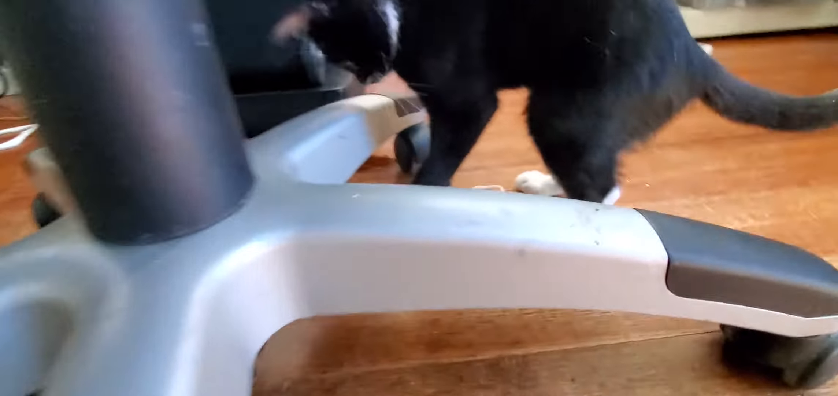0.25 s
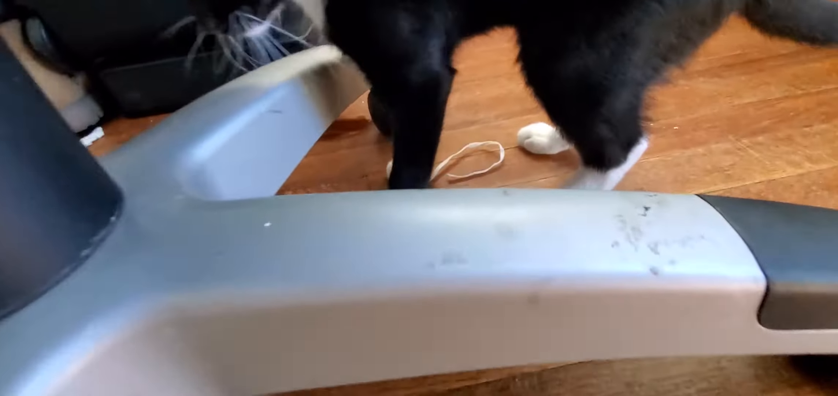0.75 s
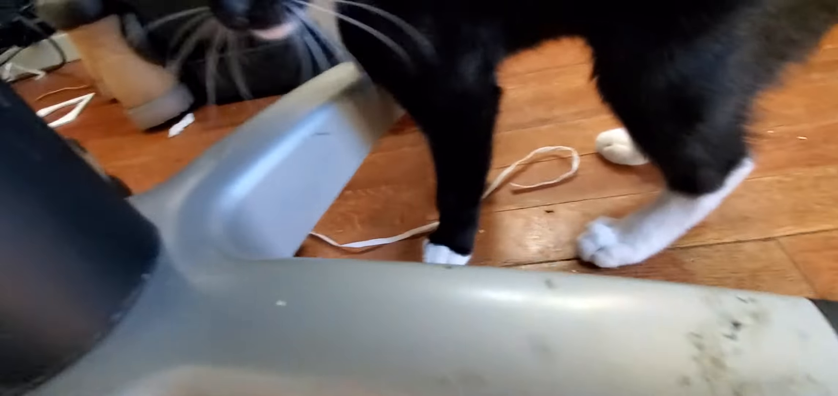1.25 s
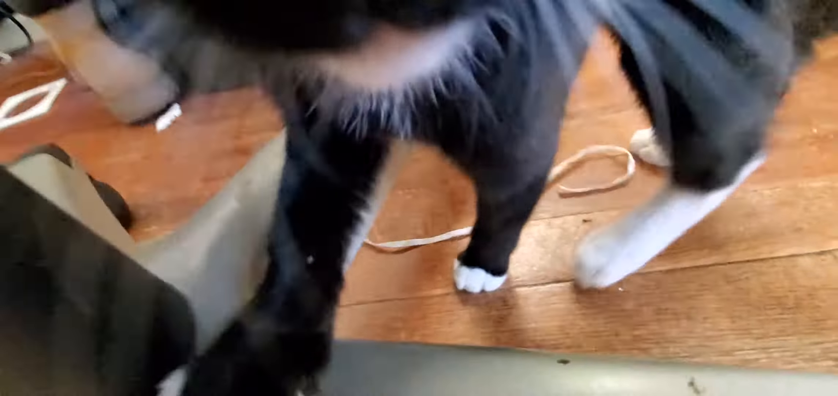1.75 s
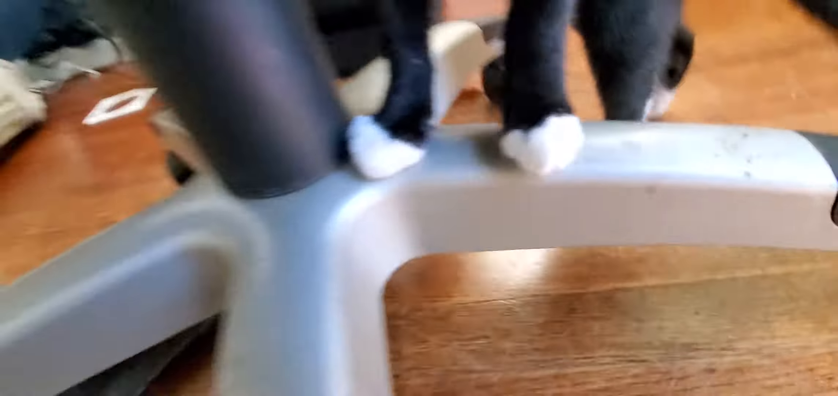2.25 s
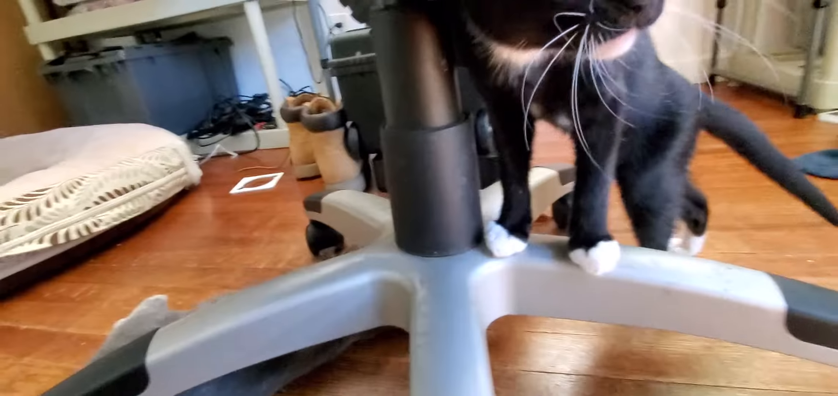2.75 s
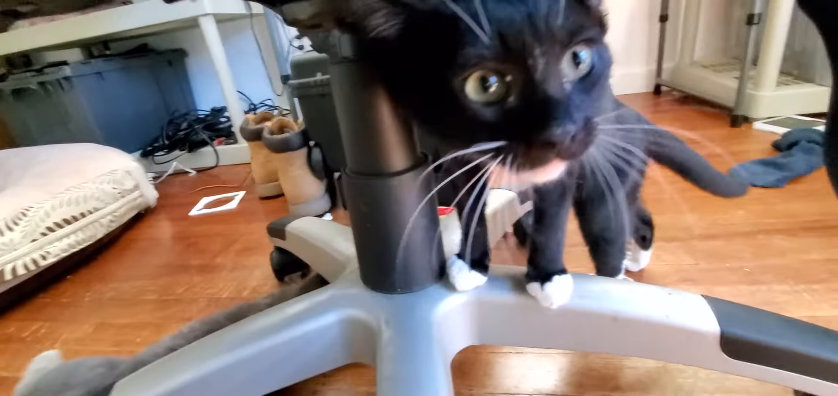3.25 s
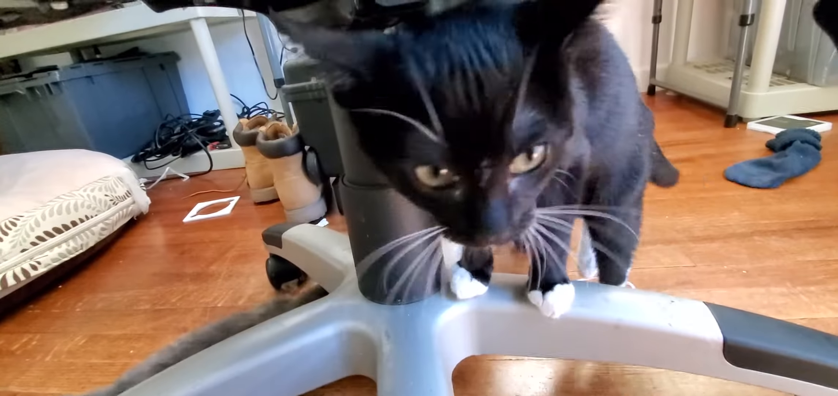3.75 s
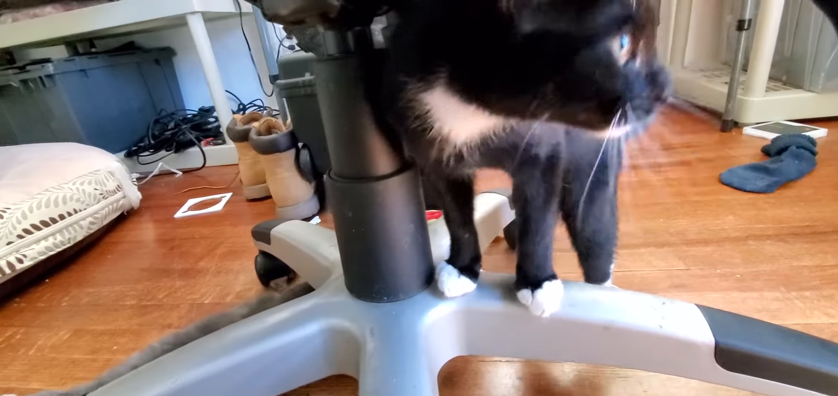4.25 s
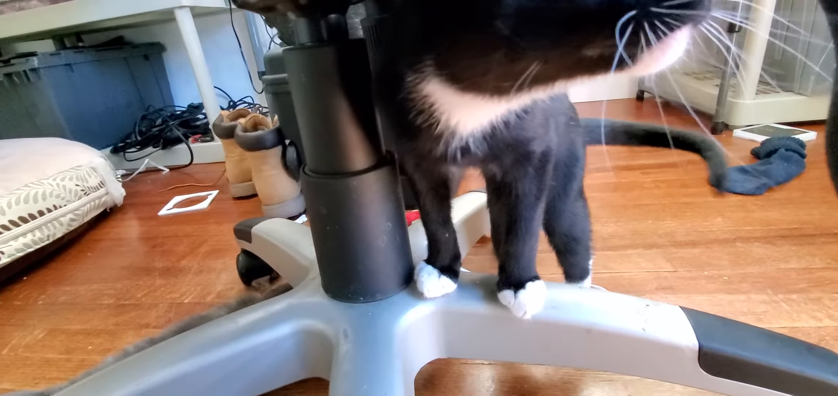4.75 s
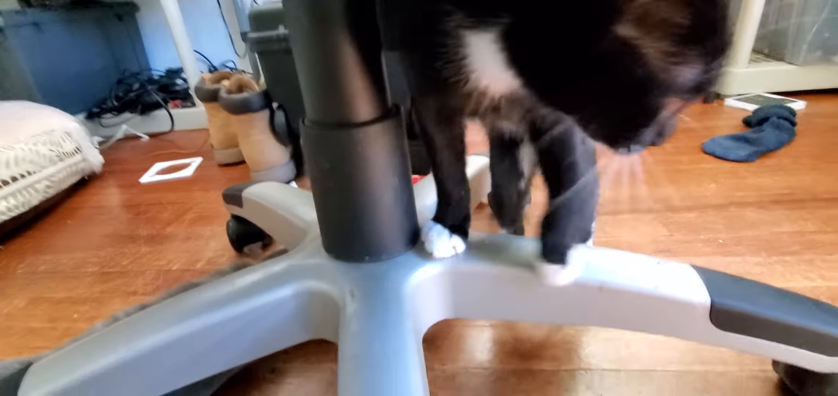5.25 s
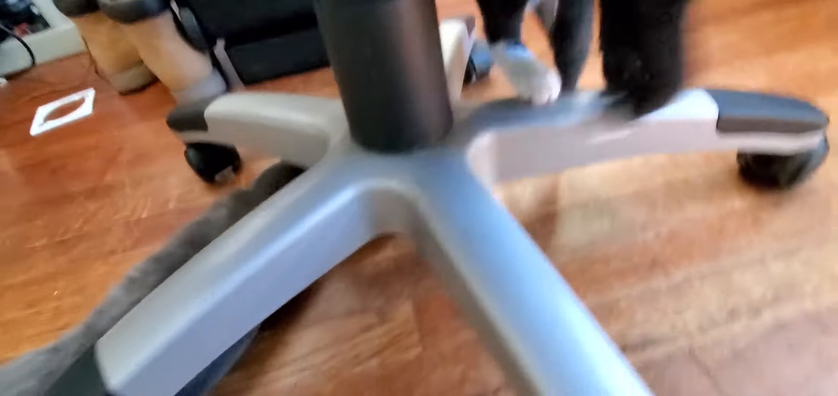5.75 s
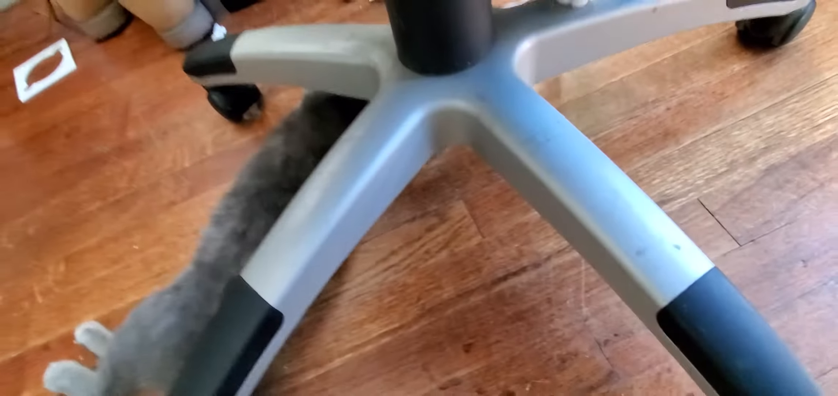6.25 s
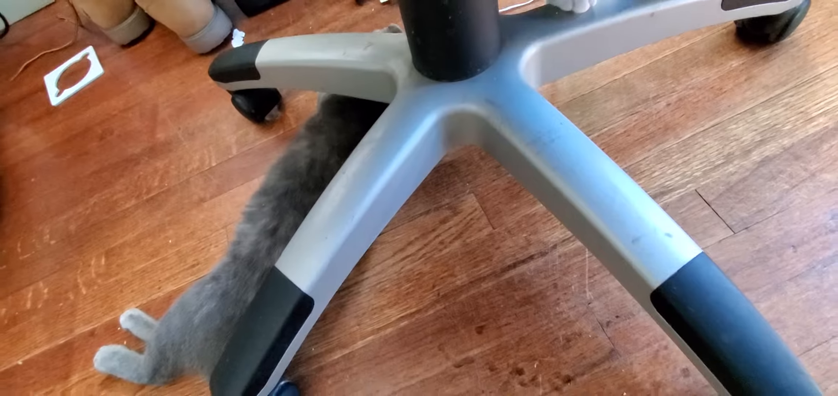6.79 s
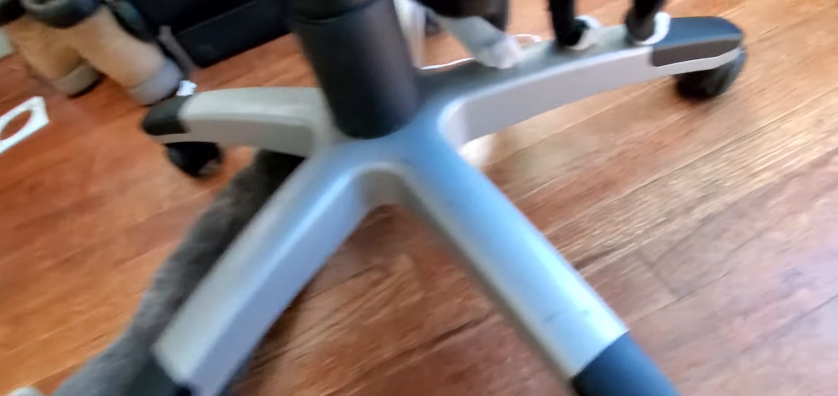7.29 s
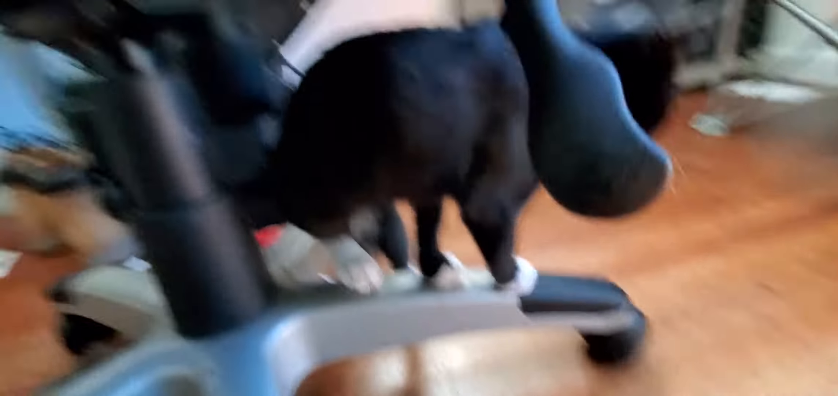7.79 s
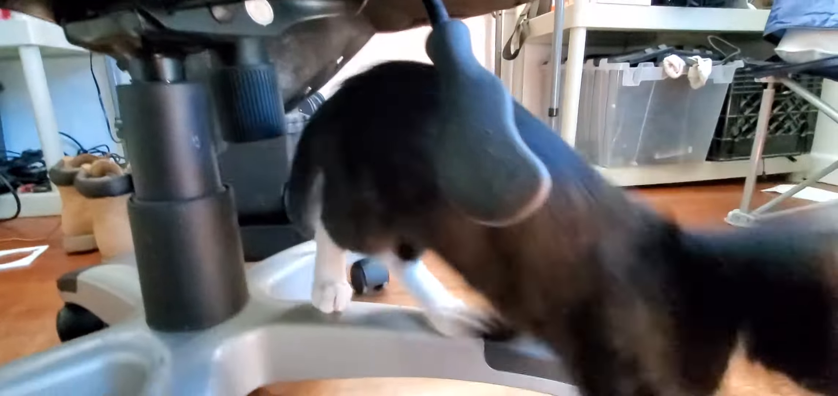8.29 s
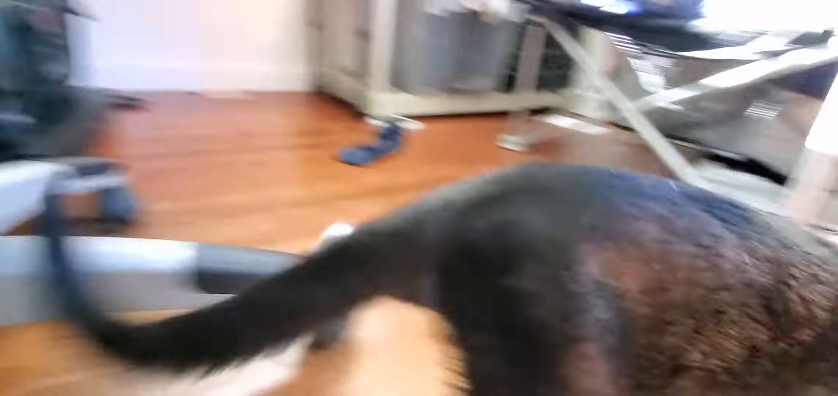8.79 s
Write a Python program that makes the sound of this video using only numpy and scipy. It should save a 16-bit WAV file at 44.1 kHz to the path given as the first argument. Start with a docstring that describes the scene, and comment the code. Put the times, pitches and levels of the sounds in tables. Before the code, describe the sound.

Quiet indoor stereo close-up: faint room noise and mains hum throughout. Small paws pad and scuff, claws tick on hard plastic, and two dry knocks crack out after a second. Just over a second later comes the loudest moment, a dense hollow clatter with thumps, followed by a short four-step rasp. The rest is nearly still, with isolated clicks, a small double knock, taps on the microphone's casing and soft final footfalls.

```python
"""A kitten clambers over the hollow plastic base of an office chair on a hardwood floor, beside a camera.
0-1.6 s: paws thud and scuff, claws click, two loud knocks near 1.1 s. 2.3-2.6 s: a loud burst of knocks.
2.8 s: a four-slip stuttering scrape. Then sparse clicks, knocks and case ticks; at 8.3 s thuds, then a soft rub.
Contacts are noise bursts shaped by resonances, ticks are dispersed pulses, thuds uneven swelling sines,
rubs and scuffs swells of noise. Room noise and a low mains hum run throughout."""
import sys
import numpy as np
from scipy import signal
from scipy.fft import rfft, irfft, next_fast_len
from scipy.io import wavfile
from scipy.ndimage import map_coordinates

SR = 44100
rng = np.random.default_rng(int(sys.argv[2]) if len(sys.argv) > 2 else 0)


def to_wav(s):
    """Save 16-bit WAV."""
    ch = np.atleast_2d(s).T  # columns
    pcm = np.round(np.clip(ch, -1, 1) * 32767)  # PCM
    wavfile.write(sys.argv[1], SR, pcm.astype(np.int16))


N = 398223
SIZE = 32768  # samples in one short event
HZ = np.fft.rfftfreq(SIZE, 1 / SR)
T = np.arange(SIZE) / SR

# blows on the chair base, level before gain_db: [t/s, level/dB, hardness/dB, ring f/Hz, t60/s, L-R/dB]
KNOCKS = [(0.1, -38, -3, 1100, 0.038, -16), (.853, -45, -7, 695, 0.035, -5),
          (1.0613, -24.5, -2.5, 1770, 0.018, -2.5), (1.09, -35, -10, 1240, .015, -1),
          (1.112, -20, 1, 1420, 0.015, -3.5), (1.56, -48.5, -9.5, 850, .022, -6),
          (2.3341, -30, 3, 2300, 0.041, 1.5), (2.339, -24, -7.5, 1500, 0.026, 0),
          (2.392, -15, -2.5, 720, .02, 1), (2.4075, -26, 7, 850, 0.011, -3.5),
          (2.4118, -15, -2.5, 1100, 0.024, -1), (2.4168, -19, -4.5, 680, 0.017, 0),
          (2.4563, -24, 1, 1400, .025, -2), (2.462, -13, 7.5, 740, .036, -1.5),
          (2.544, -40.5, 0, 1300, 0.025, 0), (2.629, -42, -8.5, 740, 0.063, 0),
          (2.906, -51, -9, 900, 0.015, 1), (5.237, -43.5, -32, 656, .05, -2),
          (5.273, -47, -26, 450, 0.032, -4), (7.3017, -34, -15, 735, .008, -6),
          (7.3104, -46, -35, 680, .02, 0)]
# spectrum of a blow: [f/Hz, level/dB]
KNOCK_TONE = [(60, -29), (200, -11), (350, -5.5), (500, -7.5), (720, -4.5), (1000, -5.5), (1400, -6.5),
              (2000, -4.5), (3000, -9.5), (4300, -14.5), (6000, -28.5), (8500, -46.5), (14000, -50.5)]
# where hardness adds treble: [f/Hz, share of hardness/1]
KNOCK_EDGE = [(1100, 0), (2400, 0.34), (4800, 1), (9000, .1)]


def knocks(gain_db=-1, even_hz=1140, weight_db_per_octave=10.5):
    """Blows on the base: the further a spot rings below even_hz, the more bass weight it gets."""
    rows = []
    for s, db, hard_db, ring_hz, t60_s, pan_db in KNOCKS:
        bass_db = weight_db_per_octave * np.log2(even_hz / ring_hz)
        rows.append((s, db + gain_db, bass_db, hard_db, ring_hz, t60_s, pan_db))
    return strikes(rows, KNOCK_TONE, KNOCK_EDGE, snap=.17, ring_db=9, sharpness=6,
                   ripple_db=2.5, spacing_hz=44.77, room_db=-12.5, grit_db=1.5)


def scrape(start_s=2.7932, slip_s=.02, rebound_s=.0048, first_db=-27, loss_db=2.5,
           bass_db=-12, bass_gain_db=4, hard_db=-1, rebound_hard_db=-8, dulling_db=1.5,
           ring_hz=1650, t60_s=.047, drag_s=.0057, pan_db=-1, count=4):
    """Stick-slip rasp: each slip catches twice; successive slips are weaker, duller and longer."""
    rows = []
    for k in range(count):
        for late_s, edge_db in [(0, hard_db), (rebound_s, rebound_hard_db)]:
            rows.append((start_s + k * slip_s + late_s, first_db - k * loss_db,
                         bass_db + k * bass_gain_db, edge_db - k * dulling_db,
                         ring_hz, t60_s + k * drag_s, pan_db))
    return strikes(rows, CLAW_TONE, CLICK_EDGE, snap=.088, ring_db=4.5, sharpness=3.3,
                   ripple_db=2.5, spacing_hz=70.1, room_db=-9.5, grit_db=2.0)


# claws catching on the plastic: [t/s, level/dB, hardness/dB, ring f/Hz]
CLAWS = [(.033, -51, -28, 885), (0.057, -55.5, 10, 5470), (0.11, -42.5, -19, 3120),
         (0.2029, -54.5, -3.5, 2800), (0.3996, -43.5, 1.5, 1540), (0.67, -55.5, 11, 3170),
         (.748, -47.5, 8, 4750), (0.761, -43.5, 8, 4470), (0.8344, -49, 10, 2640), (.931, -54, -16, 2800),
         (.987, -43, -3, 2300), (1.005, -49, -9, 1500), (1.028, -48, -16, 1300), (3.554, -39, -1, 1700),
         (5.438, -52.5, 0, 3000), (5.957, -51, -6, 2018), (6.382, -54, -2, 4000)]
# spectrum of a claw contact, also of the scrape: [f/Hz, level/dB]
CLAW_TONE = [(60, -12.5), (300, -8), (700, -5), (1100, -13), (1500, -4.5), (2400, -3), (4000, -5.5),
             (6000, -7.5), (8500, -24), (14000, -21)]
# where hardness adds treble in claws, scrape and ticks: [f/Hz, share of hardness/1]
CLICK_EDGE = [(2800, 0), (4800, .42), (9000, 0.99)]


def claws(bass_db=-2, t60_s=.03, pan_db=-4.5):
    """Light claw contacts: bass-shy clicks of one decay time, right of centre."""
    rows = [(s, db, bass_db, hard_db, ring_hz, t60_s, pan_db) for s, db, hard_db, ring_hz in CLAWS]
    return strikes(rows, CLAW_TONE, CLICK_EDGE, snap=.2, ring_db=6.5, sharpness=4.8,
                   ripple_db=2.0, spacing_hz=69.16, room_db=-8.5, grit_db=2.0)


def strikes(rows, tone, edge, snap, ring_db, sharpness, ripple_db, spacing_hz, room_db, grit_db):
    """Contacts on the base: a snap and a gritty, decaying rattle excite its resonances and the room."""
    track = np.zeros((2, N))
    body_db = along(tone, HZ) + base_db(HZ) + ripple_db * ripple(spacing_hz)
    for s, db, bass_db, hard_db, ring_hz, t60_s, pan_db in rows:
        grit = amp(grit_db * map_coordinates(rng.standard_normal(1024), [900 * T]))  # 900 knots/s
        rattle = ports(rng.standard_normal((2, SIZE))) * grit * fade(t60_s)
        force = unit(rattle) / np.sqrt(SIZE)
        force[1, 0] += snap  # right first
        force[0, 8] -= snap  # left 8 samples later, inverted
        whole = rfft(force) * causal(amp(body_db + touch(bass_db, hard_db, edge)))
        spot = causal(amp(ring(ring_hz, ring_db, sharpness)))
        near = levelled(irfft(whole * spot), db, pan_db)
        far = levelled(irfft(whole), db + room_db, pan_db / 2)  # whole base feeds the room
        add(track, s, near + room(far))
    return track


# resonances of the hollow base: [f/Hz, width/Hz, lift/dB]
BASE = [(350, 34, 1.5), (778, 110, 3.5), (1190, 140, 5), (1669, 170, 2.5), (2220, 160, -2), (3000, 390, 4),
        (3800, 160, 1.5)]


def base_db(f):
    """Resonant lift of the hollow base at f, in dB."""
    return sum(db / (1 + (2 * (f - hz) / width_hz) ** 2) for hz, width_hz, db in BASE)


def ring(ring_hz, lift_db, sharpness):
    """Resonance of the spot hit: dB over HZ."""
    return lift_db / (1 + (sharpness * (HZ / ring_hz - 1)) ** 2)


def ripple(spacing_hz):
    """Thicket of small modes: a smooth random curve over HZ."""
    return map_coordinates(rng.standard_normal(4096), [HZ / max(spacing_hz, 10)])


def touch(bass_db, hard_db, edge):
    """Contact colour: weight lifts the bass, hardness the treble; dB over HZ."""
    weight_db = along([(250, bass_db / 2), (650, bass_db), (1100, 0)], HZ)
    return weight_db + hard_db * along(edge, HZ)


# soft, heavy footfalls and bumps: [t/s, peak level/dB, f/Hz, swell/s]
THUDS = [(0.066, -39.5, 87.6, 0.0085), (.978, -27.5, 47.2, .018), (1.025, -42, 44, 0.05),
         (1.38, -50, 114, .024), (1.444, -39.5, 169, .01), (2.39, -21.5, 249.8, .003),
         (2.397, -20.5, 62, 0.0075), (2.413, -20.5, 100.7, .005), (2.416, -23, 355, .003),
         (2.469, -36, 63, .02), (2.509, -35, 114, 0.015), (5.273, -46.5, 143, 0.0098),
         (6.022, -44.5, 94.95, 0.01), (8.266, -44, 73.4, .014), (8.275, -44.5, 157, 0.017)]


def thuds(pan_db=-2, uneven_rad=.82, lag_s=.001):
    """Soft weight sets off slow, uneven cycles that swell and die; left lags right."""
    track = np.zeros((2, N))
    lags_s = np.array([[lag_s / 2], [-lag_s / 2]])
    for s, db, hz, swell_s in THUDS:
        u = T / max(swell_s, 1e-3)
        swell = u * np.exp(1 - u)  # peak 1 at swell_s
        slip = np.array([map_coordinates(knots, [hz * T]) for knots in rng.standard_normal((2, 256))])
        phase_rad = 2 * np.pi * hz * (T - lags_s) + uneven_rad * slip
        add(track, s, amp(db) * swell * np.sin(phase_rad) * pan(pan_db))
    return track


# fur and pads sliding: [middle t/s, length/s, level/dB]
SCUFFS = [(0.102, .039, -51), (0.258, .15, -61.5), (0.793, 0.37, -58), (1.018, 0.071, -48.5),
          (1.143, 0.049, -44.5), (1.337, 0.64, -62), (5.554, 0.099, -63.5), (8.797, 0.2, -68)]
# spectrum of the friction: [f/Hz, level/dB]
SCUFF_TONE = [(150, 5.5), (400, 0.5), (1000, 3), (2000, -1), (4500, -3), (6500, -11), (8500, -26),
              (13000, -15.5), (16000, -16.5)]


def scuffs(grain_db=4, catch_db=2.0, pan_db=-3, coupling=.52):
    """Friction swells that catch and slip in fine grains, partly coloured by the base."""
    t = np.arange(N) / SR
    strokes = sum(amp(db) * np.exp(-2 * ((t - s) / length_s) ** 2) for s, length_s, db in SCUFFS)
    grains = rng.standard_normal((2, N)) * amp(grain_db * wobble(700) + catch_db * wobble(60))

    def colour(hz):
        return amp(along(SCUFF_TONE, hz) + coupling * base_db(hz))

    return strokes * unit(filtered(ports(grains), colour)) * pan(pan_db)


# pads and hands rubbing on hollow plastic: [middle t/s, length/s, level/dB, resonance f/Hz]
RUBS = [(0.159, 0.065, -65.5, 174), (0.86, 0.027, -50.5, 278), (1.033, 0.016, -49, 390),
        (1.818, 0.079, -60, 410), (4.629, 0.037, -63.5, 327), (6.099, 0.055, -61.5, 543),
        (8.761, .15, -59, 228)]


def rubs(sharpness=4.5, pan_db=-2):
    """Soft rubbing stirs one low resonance into a short, hollow swell of noise."""
    track = np.zeros((2, N))
    for s, length_s, db, hz in RUBS:
        def resonance(f):
            return 1 / (1 + (sharpness * np.log((f + 1) / hz)) ** 2)

        noise = unit(filtered(rng.standard_normal((2, SIZE)), resonance))
        swell = np.exp(-2 * (T / length_s - 2) ** 2)  # peak at 2 lengths
        add(track, s - 2 * length_s, amp(db) * noise * swell * pan(pan_db))
    return track


# taps on the camera's case, and at 1.1116 s a dry claw click riding on a knock; t before lead_s: [t/s,
# level/dB, hardness/dB, ring f/Hz, L-R/dB]
TICKS = [(1.1116, -24.5, 6, 1400, -5), (1.4698, -52, 15, 4300, -23), (2, -55.5, 4, 1670, -5.5),
         (2.0535, -42.5, 5, 1120, -12), (2.3893, -17, 0.5, 4960, 9), (5.234, -58, -2, 4600, -17),
         (5.8097, -39, 10.5, 1870, -5.5), (5.886, -57.5, 18, 2920, -3), (5.982, -41, 9.5, 880, -5),
         (6.9535, -60.5, 4, 3250, -2), (7.7264, -38, -21, 2850, -9.5), (7.7587, -55.5, 2, 4500, -24),
         (7.818, -52, -4, 3200, -12), (7.854, -56.5, -4, 2980, -18), (8.144, -67.5, 6, 3500, -13)]
# spectrum of a tap: [f/Hz, level/dB]
TICK_TONE = [(60, -33), (200, -3.5), (400, -6), (700, -0.5), (1100, -3.5), (1700, -5.5), (2800, -11),
             (4200, -8), (6000, -11), (8500, -27), (14000, -28.5)]


def ticks(delay_1khz_s=.0012, lag_s=.0002, lead_s=.00055, room_db=-21, ring_db=10, sharpness=7,
          ripple_db=4.0, bass_db=1.5):
    """Bending waves carry treble faster than bass: each tap is a tiny falling chirp."""
    track = np.zeros((2, N))
    spread = np.exp(-4j * np.pi * delay_1khz_s * np.sqrt(1000 * HZ))  # delay ~ 1/sqrt(f)
    sides = np.array([-np.exp(-2j * np.pi * HZ * lag_s), np.ones(len(HZ))])  # left inverted, late
    for s, db, hard_db, ring_hz, pan_db in TICKS:
        spot_db = ring(ring_hz, ring_db, sharpness) + ripple_db * ripple(spacing_hz=448)
        colour = causal(amp(along(TICK_TONE, HZ) + touch(bass_db, hard_db, CLICK_EDGE) + spot_db))
        tap = levelled(irfft(colour * spread * sides) * (T < .1), db, pan_db)
        add(track, s - lead_s, tap + amp(room_db) * room(tap))
    return track


# room decay: [f/Hz, t60/s]
ROOM = [(100, .45), (700, 0.22), (3000, 0.2), (7000, 0.17), (15000, 0.23)]


def room(sound, build_s=.004):
    """Room answer: a fresh noise tail per spot, decaying at each frequency's own t60."""
    hz, t, z = signal.stft(rng.standard_normal((2, SIZE)), SR, nperseg=256)
    decay = np.exp(-np.log(1000) * t / along(ROOM, hz)[:, None])
    tail = signal.istft(z * decay, SR, nperseg=256)[1][:, :SIZE]
    tail = ports(tail * (1 - np.exp(-T / build_s)))
    return signal.fftconvolve(sound, unit(tail) / np.sqrt(SIZE), axes=1)[:, :SIZE]


# room noise spectrum, relative: [f/Hz, density/dB per Hz]
AIR = [(22, -27), (59, -4.5), (122, -6.5), (170, -13), (300, -19.5), (450, -25.5), (580, -23.5),
       (1000, -28), (2500, -35.5), (4500, -34.5), (6300, -41.5), (8200, -62), (13000, -44), (16000, -47.5)]
# mains hum partials, mean level: [f/Hz, level/dB rms]
HUM = [(119.5, -64.5), (180, -75), (240, -76.5)]


def background(air_db=-58.5, pan_db=-1.0, waver_db=1.6, drift_rad=.64):
    """Steady room noise plus hum partials that waver slightly in level and phase."""
    def spectrum(hz):
        port_gain = np.sqrt(np.clip(1 + along(ALIKE, hz), .1, 2))
        return amp(along(AIR, hz)) / port_gain

    air = unit(filtered(ports(rng.standard_normal((2, N))), spectrum))
    t = np.arange(N) / SR
    hum = np.zeros(N)
    for hz, db in HUM:
        level = amp(db + waver_db * wobble(3.9)) * np.sqrt(2)
        hum += level * np.sin(2 * np.pi * hz * t + drift_rad * wobble(3))
    return (amp(air_db) * air + hum) * pan(pan_db)


# left-right likeness: [f/Hz, correlation/1]
ALIKE = [(60, 0.72), (130, 0.13), (290, 0.84), (640, -0.57), (1410, -0.3), (3100, -0.36), (6820, 0.17),
         (15000, 0.62)]


def ports(pair):
    """Two unrelated signals mixed to two microphones: alike in the bass, partly opposed in the middle."""
    def mid_side(hz):
        turn_rad = np.arccos(np.clip(along(ALIKE, hz), -1, 1)) / 2
        return np.array([np.cos(turn_rad), np.sin(turn_rad)])

    mid, side = filtered(pair, mid_side)
    return np.array([mid + side, mid - side])


def amp(db):
    """dB as a gain."""
    return 10 ** (np.asarray(db) / 20)


def unit(x):
    """x at rms 1."""
    return x / np.sqrt(np.mean(x ** 2) + 1e-20)


def along(points, hz):
    """[f/Hz, value] points interpolated on a log-frequency axis."""
    f, v = np.transpose(points)
    return np.interp(np.log(hz + 1), np.log(f + 1), v)


def fade(t60_s):
    """Exponential decay of 60 dB in t60_s."""
    return np.exp(-np.log(1000) * T / np.maximum(t60_s, 1e-4))


def wobble(rate_hz):
    """Smooth random curve, rate_hz knots a second."""
    knots = rng.standard_normal(int(N * rate_hz / SR) + 4)
    return map_coordinates(knots, [np.arange(N) * rate_hz / SR])


def filtered(x, response):
    """x through a response of frequency, zero-padded."""
    m = next_fast_len(x.shape[-1] + 8192)
    return irfft(rfft(x, m) * response(np.fft.rfftfreq(m, 1 / SR)), m)[..., :x.shape[-1]]


def causal(gain):
    """Minimum-phase response of this gain: rings only after the blow."""
    cepstrum = irfft(np.log(np.maximum(gain, 1e-6)))
    fold = np.r_[1, np.full(SIZE // 2 - 1, 2), np.zeros(SIZE // 2)]
    return np.exp(rfft(cepstrum * fold))


def pan(db):
    """Left and right gains of constant power, db apart."""
    return unit(amp([[db / 2], [-db / 2]]))


def levelled(sound, db, pan_db):
    """Each side scaled to the energy of 10 ms at db, then panned."""
    rms_10ms = np.sqrt(np.sum(sound ** 2, axis=1, keepdims=True) / (SR / 100))
    return sound / rms_10ms * amp(db) * pan(pan_db)


def add(track, s, sound):
    """Mix a sound in at s seconds."""
    start = max(round(s * SR), 0)
    track[:, start:start + sound.shape[1]] += sound[:, :N - start]


def scene():
    """Everything the kitten touches, the case ticks and the quiet room."""
    return knocks() + scrape() + claws() + thuds() + scuffs() + rubs() + ticks() + background()


def record(dry, ceiling=.93, top_hz=16000):
    """Rounds off peaks towards the ceiling, then cuts steeply above top_hz."""
    rounded = dry / (1 + (dry / ceiling) ** 6) ** (1 / 6)
    return filtered(rounded, lambda hz: 1 / np.sqrt(1 + (hz / top_hz) ** 200))


dry = scene()
out = record(dry)
to_wav(out)
```